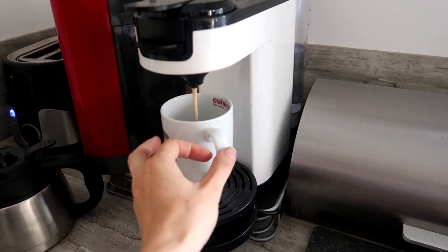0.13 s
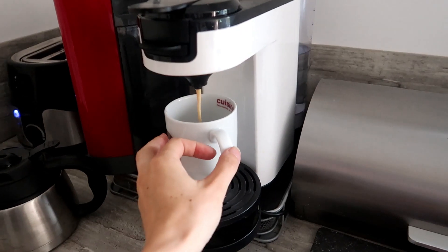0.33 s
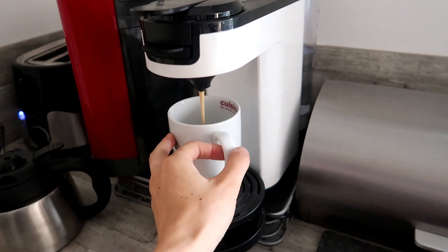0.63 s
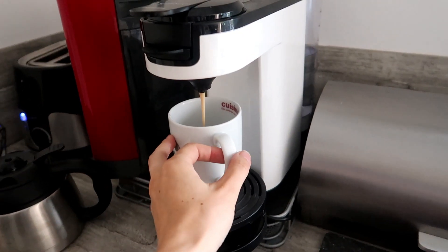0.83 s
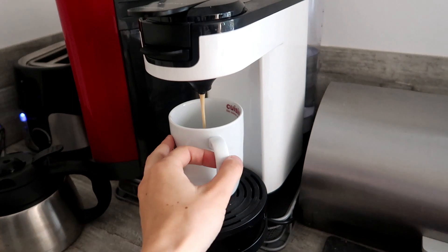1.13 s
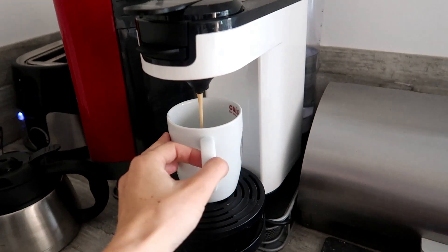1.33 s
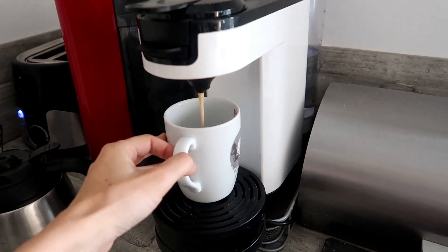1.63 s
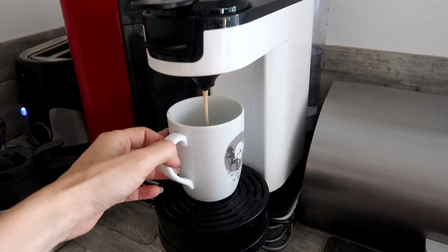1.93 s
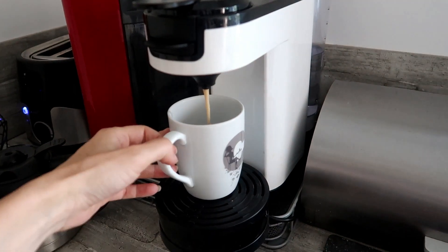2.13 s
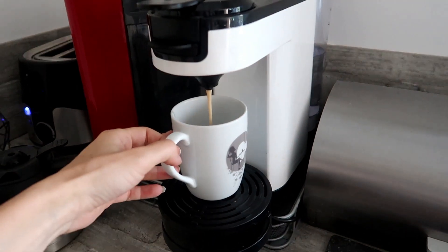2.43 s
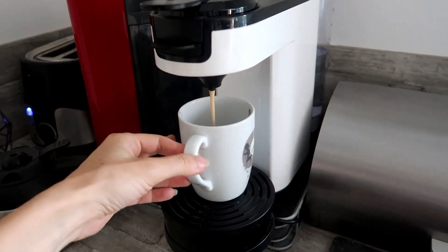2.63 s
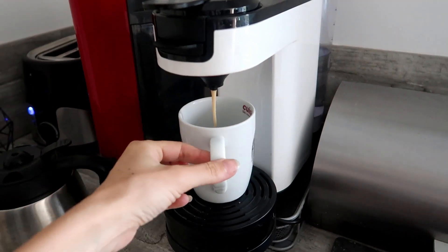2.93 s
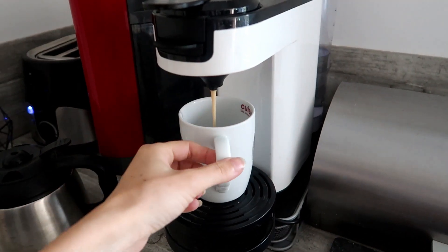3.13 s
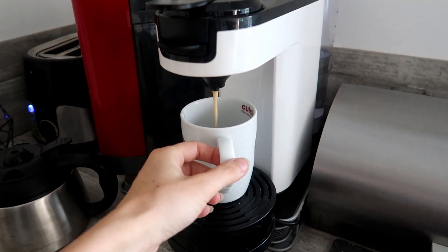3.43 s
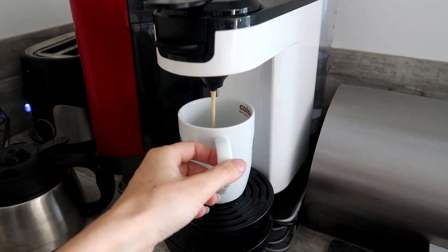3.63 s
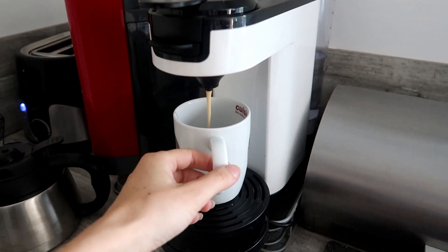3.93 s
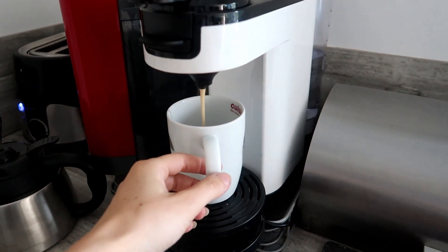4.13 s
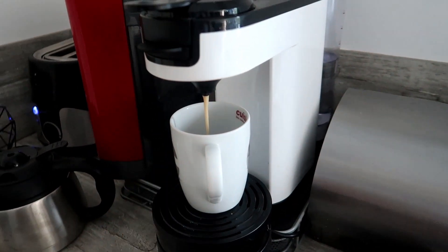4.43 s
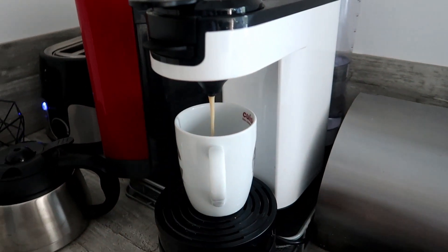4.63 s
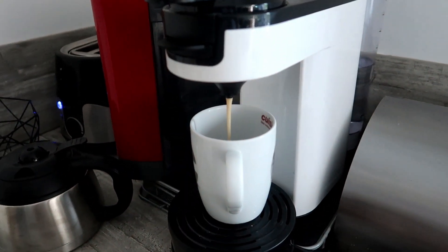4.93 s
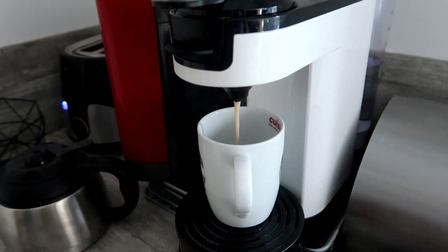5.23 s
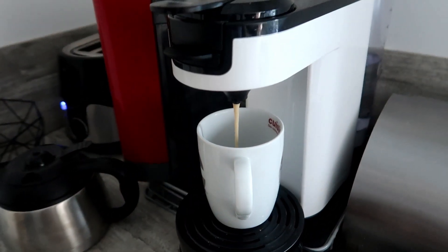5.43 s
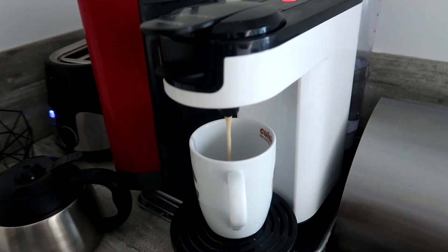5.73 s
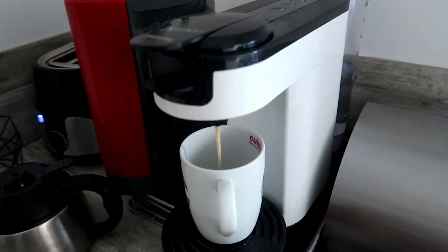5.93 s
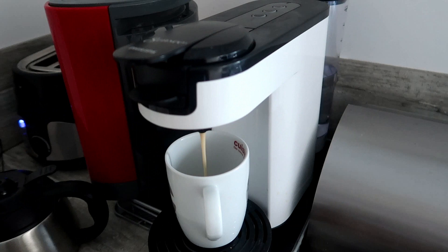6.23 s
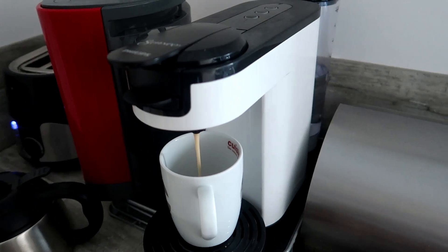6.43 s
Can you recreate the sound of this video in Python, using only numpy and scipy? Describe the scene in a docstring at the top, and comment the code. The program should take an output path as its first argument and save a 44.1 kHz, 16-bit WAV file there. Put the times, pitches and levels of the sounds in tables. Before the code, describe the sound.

A pod coffee machine brews on a kitchen counter, very close to the microphone. Its pump drones loudly without pause, a low hum with about fifty knocks a second, edged with buzzing plastic and faint valve hiss. A hand turns the mug on the drip tray, so it rattles unevenly at first; as the grip eases around four seconds the rattle softens and the case booms more fully.

```python
"""On a kitchen counter, a pod coffee machine brews close to the microphone.
Its solenoid pump hums at harmonics of the mains and knocks once per cycle, as blows filtered by the case.
Plastic parts chatter with each stroke, as decaying noise; the valve hisses in spurts of shaped noise.
A hand turns the mug on the drip tray, whose scattered bounces rattle throughout, softer as the grip eases.
A faint, steady background hiss, different at each ear, is made of filtered noise and ticks."""
import sys
import numpy as np
from scipy import signal
from scipy.fft import rfft, irfft, next_fast_len
from scipy.io import wavfile
from scipy.ndimage import uniform_filter1d, minimum_filter1d, map_coordinates

SR = 44100
rng = np.random.default_rng(int(sys.argv[2]) if len(sys.argv) > 2 else 0)


def unload_wav(signal):
    """Save mono or channel-first audio to the path in sys.argv[1] as 16-bit WAV at rate SR, clipped to [-1, 1]."""
    wavfile.write(
        sys.argv[1],
        SR,
        np.round(np.clip(np.atleast_2d(signal).T, -1, 1) * 32767).astype(np.int16),
    )


N = 291060
TIME_S = np.arange(N) / SR

MAINS_HZ = 49.99
STROKE_S = 1 / MAINS_HZ
STROKE_COUNT = int(N / SR * MAINS_HZ) + 1
TOP_HZ = 14800  # band limit of the recorder

# base levels, and the change at full grip (dB)
BOOM_DB, BOOM_HELD_DB = -9, -4.5
RATTLE_DB, RATTLE_HELD_DB = -23.5, 3.5
CHATTER_DB, CHATTER_HELD_DB = -31, 0.5
# a loose mug passes on less boom and rattles more (dB per unit of looseness)
LOOSE_BOOM_DB, LOOSE_RATTLE_DB = -1.5, 1.5
# the microphone rises from the tray to the machine's head: less boom, more chatter
LIFT_START_S, LIFT_S = 4.74, 1.37
LIFT_BOOM_DB, LIFT_CHATTER_DB = -2, 0.5


def amp(db):
    """Logarithmic level: decibels to linear gain."""
    return 10 ** (np.asarray(db) / 20)


def unit(x):
    """Power normalization: x scaled to rms 1."""
    return x / np.sqrt(np.mean(x ** 2) + 1e-20)


def curve(rows):
    """Linear interpolation: (time in s, value) rows to one value per sample."""
    times, values = np.transpose(rows)
    return np.interp(TIME_S, times, values)


def wobble(rate_hz):
    """Slow random modulation: a smooth curve through rate_hz random knots a second."""
    knots = rng.standard_normal(int(N * rate_hz / SR) + 4)
    return map_coordinates(knots, [np.arange(N) * rate_hz / SR])


def body(x, points, size=8192):
    """Minimum-phase filtering: x through a causal response given as (Hz, dB) points."""
    hz, db = np.transpose(points)
    bins_hz = np.fft.rfftfreq(size, 1 / SR)
    gain = amp(np.interp(np.log(bins_hz + 1), np.log(hz), db))
    # folding the cepstrum onto positive times makes the filter causal
    cepstrum = irfft(np.log(gain))
    cepstrum[1:size // 2] *= 2
    cepstrum[size // 2 + 1:] = 0
    impulse = irfft(np.exp(rfft(cepstrum)))[:size // 2]
    return signal.fftconvolve(x, impulse)[:N]


def resonance(x, hz, width_hz):
    """Simple resonance: the band of x that one resonator passes."""
    b, a = signal.iirpeak(hz, hz / width_hz, SR)
    return signal.lfilter(b, a, x)


def pulses(times, sizes, order=8):
    """Band-limited impulses: windowed sincs, placed between samples."""
    at = times[:, None] * SR
    taps = np.floor(at).astype(int) + np.arange(1 - order, order + 1)
    window = np.cos(np.pi * (taps - at) / (2 * order)) ** 2
    shape = np.sinc(taps - at) * window
    inside = (taps >= 0) & (taps < N)
    return np.bincount(taps[inside], (sizes[:, None] * shape)[inside], N)


def strokes(delay_s, jitter_s, scatter_db, limp_db=0):
    """Periodic excitation: one blow per mains cycle; a limp alternates strong and weak blows."""
    cycle = np.arange(STROKE_COUNT)
    late, size = rng.standard_normal((2, len(cycle)))
    times = cycle * STROKE_S + delay_s + jitter_s * late
    return pulses(times, amp(scatter_db * size + limp_db * (-1) ** cycle))


def patchy(x, depth_db):
    """Random spectral modulation: x with slow, narrow patches of random gain."""
    spectrum = signal.stft(x, nperseg=512)[2]
    field = rng.standard_normal(spectrum.shape)
    field = uniform_filter1d(field, size=3, axis=0)  # along frequency
    field = uniform_filter1d(field, size=110, axis=1)  # along time
    return signal.istft(spectrum * amp(depth_db * unit(field)), nperseg=512)[1][:N]


# the hand's grip on the mug; columns: start_s, grip [1 firmly held, 0 free]
GRIP_POINTS = [(0, 1), (3.5, 0.87), (4.4, 0.19)]


def hand_grip():
    """Contact loading: how firmly the hand holds the mug, easing over time."""
    return curve(GRIP_POINTS)


def gripped(x, response):
    """Variable loading: x at rms 1 through a body crossfaded from its held to its free response."""
    grip = hand_grip()
    hz, held_db, free_db = np.transpose(response)
    held = unit(body(x, list(zip(hz, held_db))))
    free = unit(body(x, list(zip(hz, free_db))))
    return grip * held + (1 - grip) * free


# shifts of the mug on the tray; columns: middle_s, half_length_s,
# looseness [near 1 tipped and rattling, below 0 firmly seated]
MUG_SHIFTS = [(1.15, 0.44, 1.3), (1.62, .14, 1.1), (2.28, 0.3, 0.78), (2.47, .35, -1.1), (2.73, 0.14, 1.1),
              (3.72, 0.47, -0.68), (3.94, .14, 1.3), (5.93, 0.28, -0.96)]


def looseness():
    """Changing contact: each shift tips or seats the mug and eases off again."""
    total = np.zeros(N)
    for middle_s, half_length_s, depth in MUG_SHIFTS:
        phase = np.clip((TIME_S - middle_s) / half_length_s, -1, 1)
        total += depth * np.cos(np.pi / 2 * phase) ** 4
    return total


def lift():
    """Changing source distance: the microphone's rise towards the machine's head, 0 to 1."""
    return np.clip((TIME_S - LIFT_START_S) / LIFT_S, 0, 1)


# spectrum of the background hiss, relative; columns: pitch_hz, level_db [dB per Hz]
HISS_SPECTRUM = [(25, -30), (90, -30), (170, -6), (300, 9.5), (600, 4.5), (1000, -6.5), (3500, -1.5),
                 (6900, -5), (8000, -8), (10500, -9), (12000, -10.5), (13500, -18), (15000, -48)]


def background(level_db=-39.5, grain_db=-9, grain_count=2500, flicker_db=1.0):
    """Broadband noise: a faint, steady hiss of filtered noise and tiny random ticks."""
    grains = pulses(rng.uniform(0, N / SR, grain_count), rng.standard_normal(grain_count))
    hiss = patchy(rng.standard_normal(N), depth_db=1.0)
    grainy_hiss = hiss + amp(grain_db) * unit(grains)
    return amp(level_db + flicker_db * wobble(14)) * unit(body(grainy_hiss, HISS_SPECTRUM))


# spurts through the valve; columns: start_s [peak, after the stroke begins],
# width_s [standard deviation], power [peak, relative to the steady flow]
VALVE_SPURTS = [(.005, .002, .8), (.0132, .0012, 1.2)]
# spectrum of the valve's hiss, relative; columns: pitch_hz, level_db [dB per Hz]
VALVE_SPECTRUM = [(1500, -29), (3000, 6.5), (4300, 2.5), (5400, -1.5), (6400, -9), (7000, -1),
                  (7700, -22.5), (9500, -31), (12000, -21.5), (13500, -77), (15000, -35)]


def valve(level_db=-40.0, flicker_db=0.44):
    """Jet noise: water hisses through the valve, in two spurts a stroke."""
    since_s = TIME_S % STROKE_S
    flow_power = np.ones(N)
    for peak_s, width_s, power in VALVE_SPURTS:
        flow_power += power * np.exp(-.5 * ((since_s - peak_s) / width_s) ** 2)
    spray = patchy(rng.standard_normal(N), depth_db=2.0) * np.sqrt(flow_power)
    return amp(level_db + flicker_db * wobble(14)) * unit(body(spray, VALVE_SPECTRUM))


# narrow panel resonances; columns: pitch_hz, width_hz, held_db, free_db [mug held or standing free]
PANEL_MODES = [(1977, 110, -56, -40), (2374, 90, -45, -40.5), (2613, 130, -54.5, -40.5),
               (3280, 89, -51.5, -43), (4020, 53, -47, -65), (4426, 78, -51.5, -56),
               (5370, 67, -56.5, -49.5), (5970, 81, -50.5, -63), (6790, 140, -54.5, -51)]


def panels(shake, swell_db=1.7, swell_rate_hz=0.72):
    """Modal resonance: panel modes follow the grip, and swell and fade as the microphone moves."""
    grip = hand_grip()
    out = np.zeros(N)
    for hz, width_hz, held_db, free_db in PANEL_MODES:
        db = grip * held_db + (1 - grip) * free_db + swell_db * wobble(swell_rate_hz)
        out += amp(db) * unit(resonance(shake, hz, width_hz))
    return out


# contacts within one stroke; columns: start_s [after the stroke begins], level_db [relative]
PLASTIC_CONTACTS = [(.003, -3), (.0042, 0), (.006, 0), (.0083, -.5), (.0105, -5), (.0127, -3), (.016, -6),
                    (.019, -10)]
# spectrum of the plastic, relative; columns: pitch_hz, level_db [dB per Hz]
PLASTIC_SPECTRUM = [(1100, -21), (1420, 0), (1600, 4), (1950, 2), (2150, 0.5), (2380, 1), (3450, -2.5),
                    (3900, -10), (5400, -16.5), (7000, -19.5), (8000, -23.5), (15000, -67)]


def chatter(t60_s=0.023, rough_db=-4, drift_rad=0.56, room_db=-17, room_t60_s=0.36):
    """Repeated impact: each contact rings the plastic in its own way, with a puff of rasp."""
    ring_time = np.arange(SR // 8) / SR
    fade = amp(-60 * ring_time / t60_s) + amp(room_db - 60 * ring_time / room_t60_s)
    ring, rasp_power = np.zeros(N), np.zeros(N)
    for delay_s, db in PLASTIC_CONTACTS:
        blows = amp(db) * strokes(delay_s, jitter_s=.00001, scatter_db=1.8)
        # two rings mix in turn: the colour changes slowly as the microphone moves
        angle = drift_rad * wobble(1.21) + np.linspace(0, np.pi / 2, N)
        for weight in (np.cos(angle), np.sin(angle)):
            ring_shape = fade * rng.standard_normal(len(ring_time))
            ring += weight * signal.fftconvolve(blows, ring_shape)[:N]
        rasp_power += signal.fftconvolve(blows ** 2, fade ** 2)[:N]
    rasp = np.sqrt(np.abs(rasp_power)) * rng.standard_normal(N)
    shake = unit(ring) + amp(rough_db) * unit(rasp)
    plastic_db = CHATTER_DB + CHATTER_HELD_DB * hand_grip()
    plastic = amp(plastic_db) * unit(body(shake, PLASTIC_SPECTRUM))
    return amp(LIFT_CHATTER_DB * lift()) * (plastic + panels(shake))


# relative response of tray and mug to bouncing; columns: pitch_hz, held_db, free_db [mug held or free]
TRAY_RESPONSE = [(30, -30, -27), (104, -20.5, -22), (137, -10, -12), (211, -12, -13.5), (285, 3.5, 1.5),
                 (324, -4.5, -1.5), (373, -1.5, 2), (450, -7.5, -4), (498, -0.5, -3.5), (576, -12.5, -10),
                 (670, -13, -13), (870, -17.5, -7), (1020, -11, -11), (1306, -22.5, -17.5),
                 (2700, -60.5, -55.5)]


def rattle(count=24, spread_s=.007, rock=0.053):
    """Random impacts: tray and mug bounce unevenly, most densely just after the plunger's stop."""
    level_db = RATTLE_DB + RATTLE_HELD_DB * hand_grip() + LOOSE_RATTLE_DB * looseness()
    centres = np.arange(STROKE_COUNT)[:, None] * STROKE_S + .006
    times = (centres + spread_s * rng.standard_normal((STROKE_COUNT, count))).ravel()
    sizes = np.sign(rng.standard_normal(len(times)))
    # what rocks one way on this stroke rocks back on the next
    bounces = pulses(times, sizes) - rock * pulses(times + STROKE_S, sizes)
    return amp(level_db) * gripped(bounces, TRAY_RESPONSE)


# the hum's third harmonic; columns: start_s, level_db [before third_trim_db is added]
THIRD_HARMONIC = [(0.15, -25), (2.06, -20), (4.64, -21), (6.45, -21.5)]


def hum(beat_hz=0.76, beat_db=1.2, first_db=-20.5, third_trim_db=0.16):
    """Forced vibration: the plunger shakes the machine, mostly at odd harmonics; the first beats slowly."""
    turn = 2 * np.pi * MAINS_HZ * TIME_S
    beat = np.cos(2 * np.pi * beat_hz * (TIME_S - 1.15))
    first = amp(first_db + beat_db * beat) * np.cos(turn)
    second = amp(-39) * np.cos(2 * turn)
    third = amp(curve(THIRD_HARMONIC) + third_trim_db) * np.cos(3 * turn)
    return -np.sqrt(2) * (first + second + third)  # root 2 turns rms levels into peaks


# slow bending waves that smear each blow; columns: pitch_hz, width_hz
BENDING_WAVES = [(520, 100), (720, 70), (960, 80), (1180, 90), (1420, 110)]
# relative response of case and tray to a blow; columns: pitch_hz, held_db, free_db [mug held or free]
CASE_RESPONSE = [(200, -9, -8), (250, -10, -7), (300, -7, -4), (350, -11, -9), (400, -8, -1),
                 (450, -23, -19), (500, -10, -9), (550, -12, -10), (600, -20, -20), (650, -24, -21),
                 (700, -25, -23), (750, -29, -28), (800, -23, -20), (850, -25, -20), (900, -31, -23),
                 (950, -29, -23), (1000, -19, -19), (1050, -23, -26), (1100, -30, -37), (1150, -36, -35),
                 (1200, -23, -19), (1250, -27, -35), (1300, -29, -37), (1350, -38, -40), (1400, -28, -29),
                 (1450, -38, -34), (1500, -31, -30)]


def knock(waver_s=0.00011):
    """Impact and resonance: the plunger is pulled in, then hits its stop, and the case booms."""
    grip = hand_grip()
    level_db = BOOM_DB + BOOM_HELD_DB * grip + LOOSE_BOOM_DB * looseness() + LIFT_BOOM_DB * lift()
    pull = .55 * strokes(delay_s=-.0019, jitter_s=.00001, scatter_db=.3)
    stop = -strokes(delay_s=.0031, jitter_s=.00001, scatter_db=.2, limp_db=.4)
    blows = pull + stop
    for hz, width_hz in BENDING_WAVES:
        blows = blows - 2 * resonance(blows, hz, width_hz)  # delays this band, keeps its level
    # steep skirts confine the boom to the case's band
    response = [(120, -55, -55), (150, -42, -42), *CASE_RESPONSE, (1650, -42, -42), (3000, -75, -75)]
    boom = gripped(blows, response)
    # the turning hand loads the tray unevenly, so the boom comes a little early or late
    lag_s = waver_s * grip * wobble(3.98)
    return amp(level_db) * map_coordinates(boom, [np.arange(N) - lag_s * SR], mode="nearest")


def scene():
    """Superposition: the machine stands straight ahead, the background hiss differs at each ear."""
    both_ears = np.array([background(), background()])
    return both_ears + valve() + chatter() + rattle() + hum() + knock()


def record(dry):
    """Peak limiting and band limiting: the recorder ducks the highest peaks and cuts the top."""
    needed = np.minimum(1, .95 / (np.abs(dry).max(axis=0) + 1e-9))
    gain = uniform_filter1d(minimum_filter1d(needed, size=441), size=441)
    m = next_fast_len(N + SR // 4)
    passed = np.fft.rfftfreq(m, 1 / SR) < TOP_HZ
    return irfft(rfft(dry * gain, m) * passed, m)[:, :N]


dry = scene()
out = record(dry)
unload_wav(out)
```